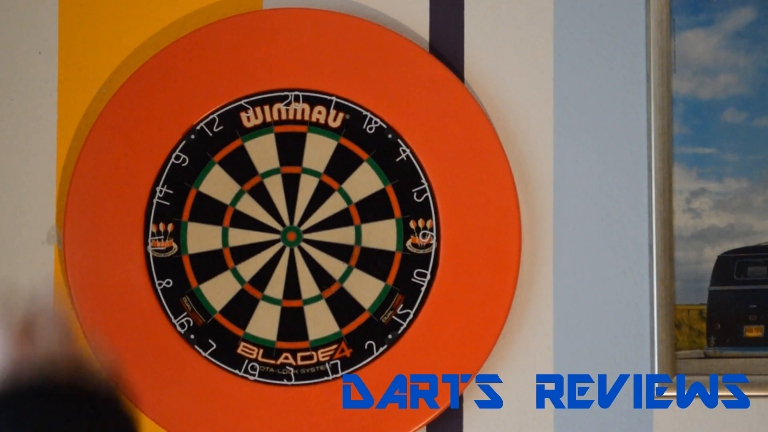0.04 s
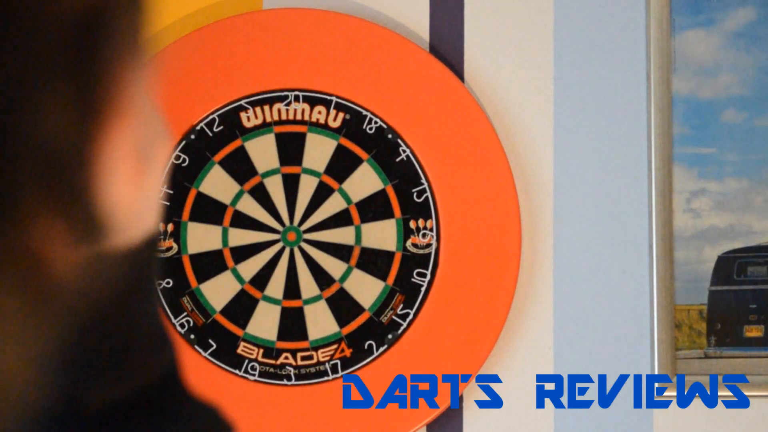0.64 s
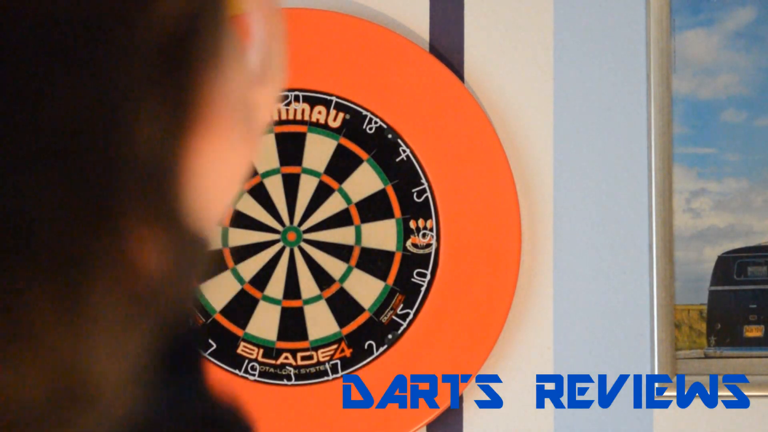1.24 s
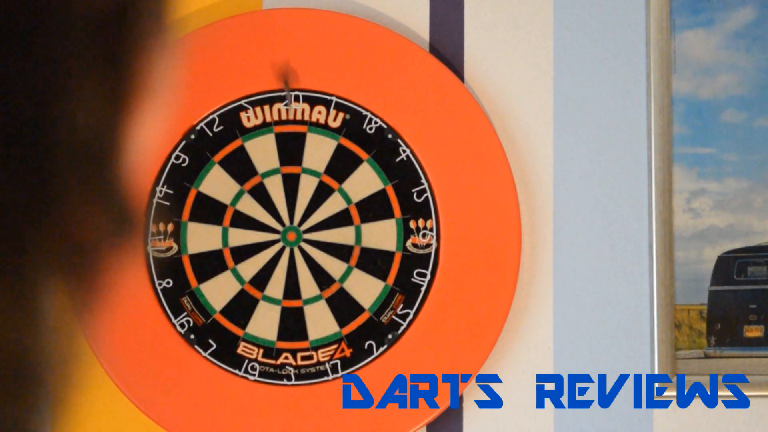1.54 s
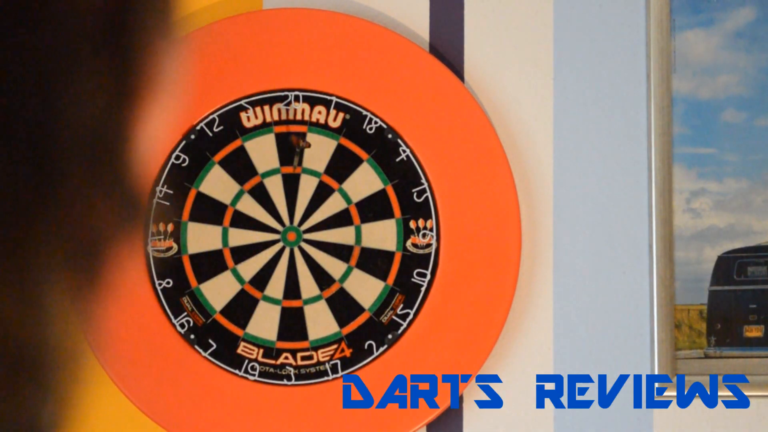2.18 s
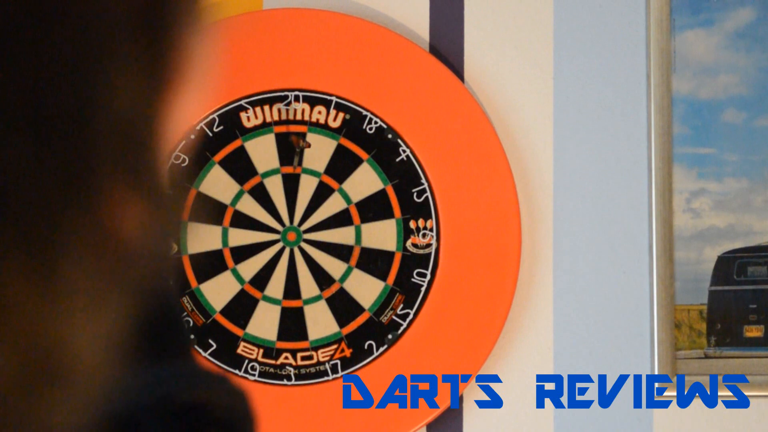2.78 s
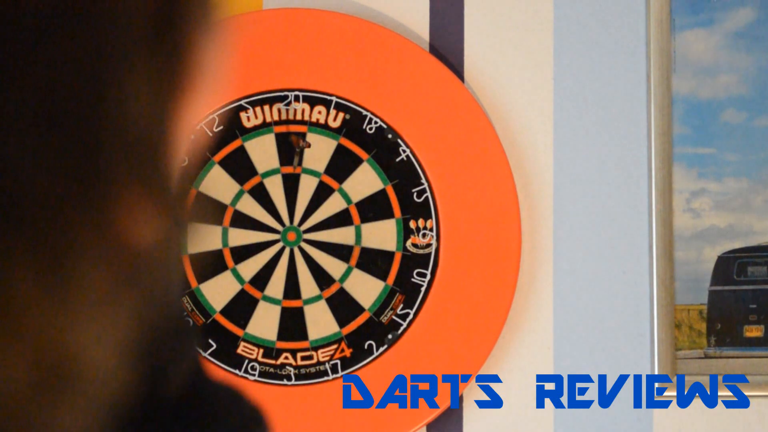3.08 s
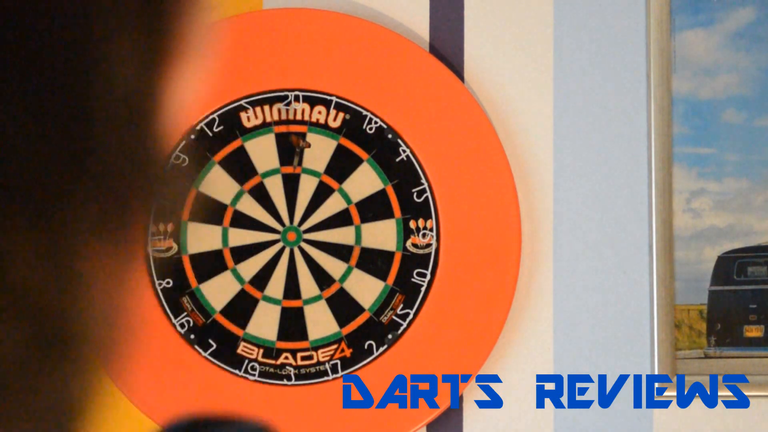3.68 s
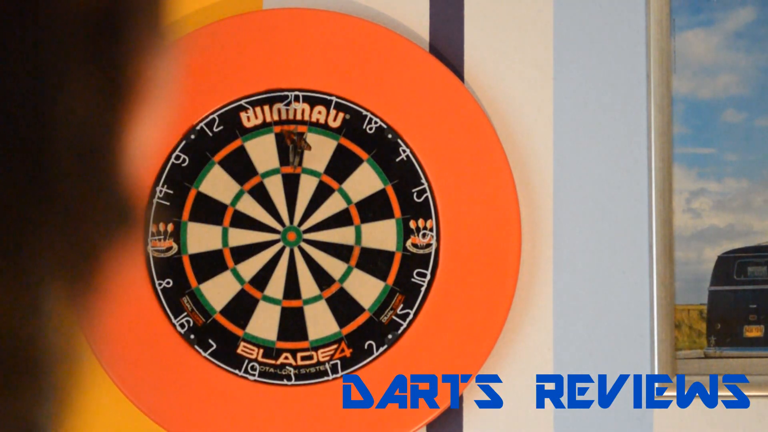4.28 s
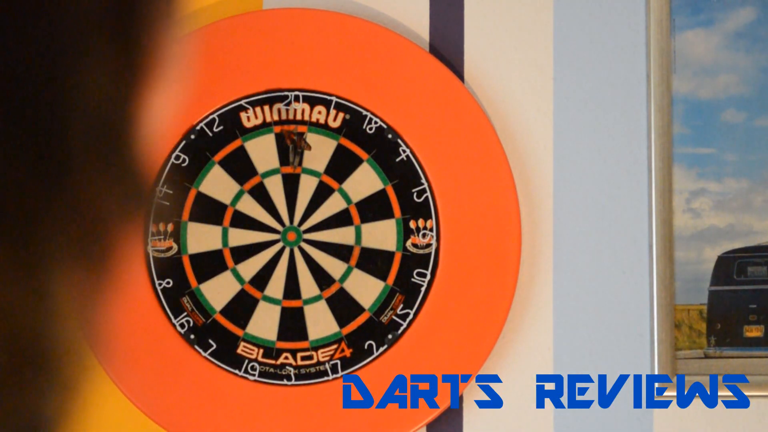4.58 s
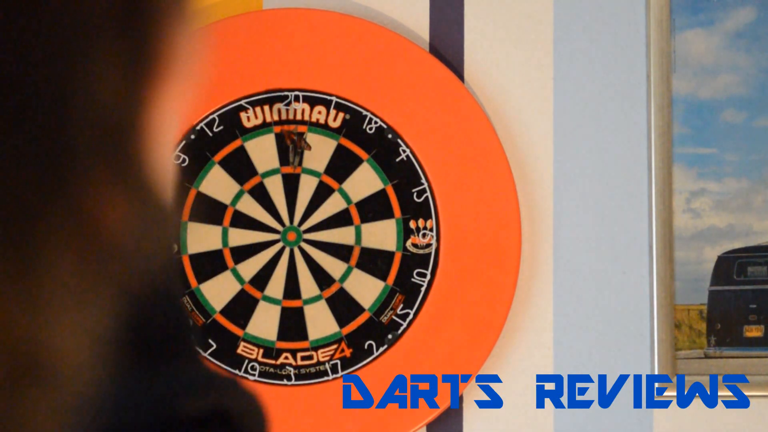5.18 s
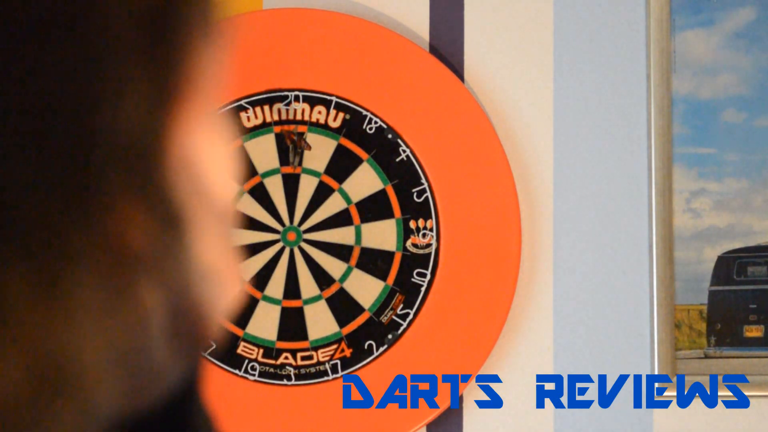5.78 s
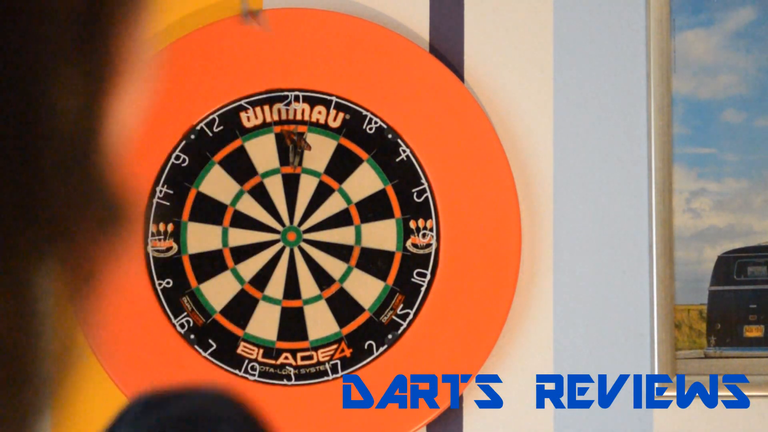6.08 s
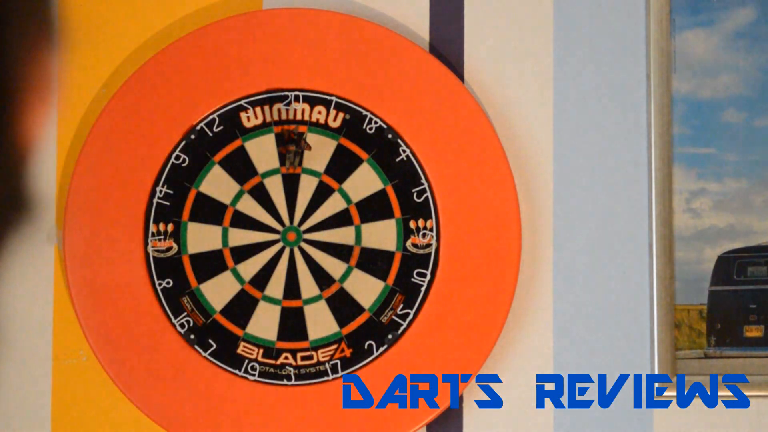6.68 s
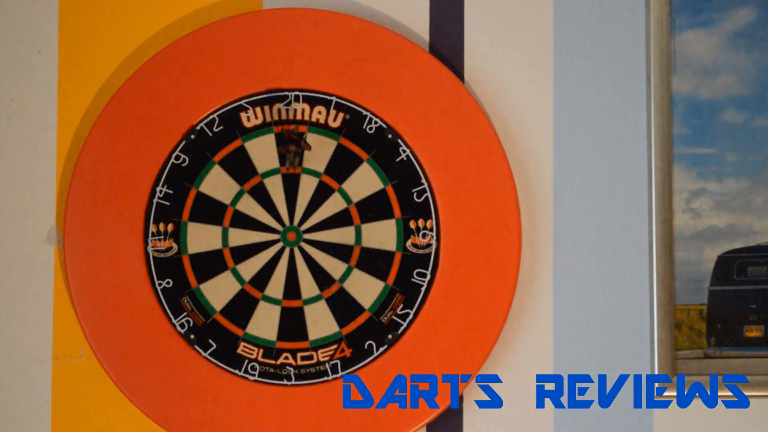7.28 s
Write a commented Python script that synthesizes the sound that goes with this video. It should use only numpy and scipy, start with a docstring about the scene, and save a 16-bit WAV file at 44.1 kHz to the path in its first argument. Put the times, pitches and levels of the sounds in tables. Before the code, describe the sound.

Three darts thud one after another into a wall-mounted board in a quiet room, the later ones clicking against those already stuck.

```python
"""Three darts in a quiet room

Each dart drums a wall-mounted bristle board, knocks in its fibres, clicks on the wire and rings its
own shaft; the later ones clash with those already stuck. The thrower shifts his feet, his sleeve
swishes, barrels chink in his hand. A clock ticks over faint hiss, whine, hum and a wavering drone."""
import sys
import numpy as np
from scipy import signal
from scipy.fft import rfft, irfft
from scipy.io import wavfile
from scipy.ndimage import uniform_filter1d

SR = 44100
rng = np.random.default_rng(int(sys.argv[2]) if len(sys.argv) > 2 else 0)


def int16_out(signal):
    """Quantize to a 16-bit WAV file."""
    q = np.round(np.clip(np.atleast_2d(signal).T, -1, 1) * 32767)
    wavfile.write(sys.argv[1], SR, q.astype(np.int16))


N = 323694
T = np.arange(N) / SR
RING_T, CONTACT_T = T[:SR], T[:4096]

# landings: t/s, thud/dB, drum-mode boost/dB, hollow-mode boost/dB, knock/dB,
# shaft f/Hz, shaft/dB, wire click/dB, barrel ring/dB
LANDINGS = [(1.842, -2, 0, 1.5, -2, 4280, -12.5, -15.5, -66),
            (4.1378, -1, -6.5, 5, -2, 3950, -12.5, -7, -52),
            (6.4605, -0.5, 2.5, -10, 0.5, 4450, -5, -7, -34)]
# board on its wall: f/Hz, level/dB, t60/s
BOARD_MODES = [(39.9, -50.5, 0.86), (59, -47, 0.58), (152.5, -42, 0.32), (189.3, -34.5, 0.28),
               (210.6, -39, 0.29), (258, -40.5, 0.37), (309, -42, 0.2), (358.3, -34.5, 0.36),
               (386.8, -20.5, 0.25), (412.4, -32.5, 0.36), (462.5, -32.5, 0.31), (581, -37, 0.44),
               (605, -33.5, 0.31), (616, -28.5, 0.23), (624.7, -24.5, 0.2), (703, -31.5, 0.24),
               (728, -30, 0.13), (790, -44, 0.25), (960, -41, 0.3), (1465, -36.5, 0.29),
               (1640, -42.5, 0.31), (1709, -39.5, 0.35), (1876, -34, 0.19)]


def board_thuds(build_cycles=0.76, wire_db=6, wire_db_per_click_db=0.66):
    """A stopping dart pushes the board; the spot weights the modes, a harder click rings the wires more."""
    def band(centre_hz, octaves):
        return np.exp(-(np.log2(np.array(BOARD_MODES)[:, 0] / centre_hz) / octaves) ** 4)

    out = np.zeros(N)
    # low modes swing up slowest, so the wall's rumble comes last
    modes = [undb(db) * mode(hz, t60_s) * (1 - np.exp(-RING_T * hz / build_cycles))
             for hz, db, t60_s in BOARD_MODES]
    drum, hollow, wire = band(470, octaves=0.85), band(745, octaves=0.15), band(1750, octaves=0.2)
    for t_s, thud_db, drum_db, hollow_db, *_, click_db, _ in LANDINGS:
        wire_boost_db = wire_db + wire_db_per_click_db * click_db
        modes_db = thud_db + drum_db * drum + hollow_db * hollow + wire_boost_db * wire
        add(out, t_s, undb(modes_db) @ modes)
    return out


# fibre crunch spectrum: f/Hz, level/dB
KNOCK_SPECTRUM = [(90, -51), (200, -2.5), (500, -6.5), (720, 4.5), (1150, -5), (1550, -2), (1900, -5.5),
                  (2400, -16.5), (2850, -14.5), (3400, -9.5), (4000, -12.5), (5200, -29), (15000, -47)]


def point_knocks(crunch_t60_s=0.0292, sink_s=0.0025, lead_s=0.0025, shaft_t60_s=0.031):
    """The point crunches into the fibres just before the board gives, and the shaft shivers."""
    out = np.zeros(N)
    for t_s, _, _, _, knock_db, shaft_hz, shaft_db, *_ in LANDINGS:
        crunch = unit(colour(burst(crunch_t60_s, sink_s), KNOCK_SPECTRUM))
        add(out, t_s - lead_s, undb(knock_db) * room(crunch))
        shiver = unit(narrow(burst(shaft_t60_s), shaft_hz, width_hz=550))
        add(out, t_s, undb(shaft_db) * room(shiver))
    return out


# darts and flights clashing: t/s, click level/dB, slide before the click/s
CLASHES = [(1.91, -29, .001), (2.1925, -25.5, .005), (4.1342, -5, .009), (4.1553, -9, .002),
           (6.196, -44, .004), (6.456, 4.5, .005), (6.4718, -16, .002)]


def contacts(seat_lag_s=0.0006, seat_slide_s=0.005, seat_slide_db=3.3, full_slide_s=0.0078,
             clash_ring_db=-58):
    """Wire contacts and clashes as rows of t/s, click/dB, slide/s, slide/dB, ring/dB."""
    seats = [(t_s + seat_lag_s, db, seat_slide_s, db + seat_slide_db, ring_db)
             for t_s, *_, db, ring_db in LANDINGS]
    clashes = [(t_s, db, slide_s, db + 20 * np.log10(slide_s / full_slide_s), db + clash_ring_db)
               for t_s, db, slide_s in CLASHES]
    return seats + clashes


# metal click spectrum: f/Hz, level/dB
CLICK_SPECTRUM = [(200, -12), (1000, -10), (2000, -4), (3000, -6), (4400, 0.5), (5600, -3), (7100, 2),
                  (10500, 1), (11500, -6.5), (12400, -12.5), (15500, -23)]


def dart_clicks(snap_t60_s=0.007, start_pressure=0.15):
    """A dart slides along the wire or another dart, ever harder, then snaps against it."""
    out = np.zeros(N)
    for t_s, click_db, slide_s, slide_db, _ in contacts():
        pressure = np.interp(CONTACT_T, [0, slide_s], [start_pressure, 1], right=0)
        slide = colour(cluster(pressure), CLICK_SPECTRUM)
        add(out, t_s - slide_s, undb(slide_db) * room(slide))
        snap = colour(burst(snap_t60_s), CLICK_SPECTRUM)
        add(out, t_s, undb(click_db) * room(snap))
    return out


# barrel, shaft and flight: f/Hz, level/dB, t60/s
DART_RESONANCES = [(3170, -1.5, 0.24), (3820, -15, 0.33), (4385, 9, 0.15), (4740, -12, 0.28),
                   (4580, 7, 0.17), (4800, -11, 0.25), (5078, -21, .22), (5630, -4, .28), (5800, -5, 0.37),
                   (6010, 8, 0.14), (6500, -19, 0.15), (6850, -27, 0.19), (8272, -24, 0.18),
                   (9000, -31, 0.11)]


def dart_rings(build_s=0.0045):
    """A dart rings on after each contact, most when hit squarely."""
    out = np.zeros(N)
    ring = sum(undb(db) * mode(hz, t60_s) for hz, db, t60_s in DART_RESONANCES)
    ring *= 1 - np.exp(-RING_T / build_s)
    for t_s, *_, ring_db in contacts():
        add(out, t_s, undb(ring_db) * ring)
    return out


# barrels touching: t/s, ping f/Hz, level/dB
BARREL_TOUCHES = [(4.497, 3620, -41), (4.554, 4480, -43)]


def barrel_chinks(touch_t60_s=0.02, tick_db=4):
    """Barrels touch in the hand: a tick and a brief ping."""
    out = np.zeros(N)
    for t_s, hz, db in BARREL_TOUCHES:
        touch = burst(touch_t60_s)
        ping = unit(narrow(touch, hz, width_hz=320))
        tick = undb(tick_db) * colour(touch, CLICK_SPECTRUM)
        add(out, t_s, undb(db) * room(ping + tick))
    return out


# cloth spectrum: f/Hz, level/dB
SLEEVE_SPECTRUM = [(40, -27), (200, 13), (600, -1), (2000, 9), (5000, -6), (10500, -1.5), (15000, -20)]
# arm movements: t/s, half-length/s, level/dB
ARM_MOVES = [(1.59, 0.037, -59.5), (3.89, 0.1, -66), (4.552, 0.058, -70), (6.215, 0.054, -59.5)]


def sleeve_swishes():
    """Cloth swishes as the arm moves."""
    envelope = sum(undb(db) * hump(t_s, half_s) for t_s, half_s, db in ARM_MOVES)
    return envelope * colour(rng.standard_normal(N), SLEEVE_SPECTRUM)


# weight shifts: t/s, floor sway/dB, scuff/dB
WEIGHT_SHIFTS = [(0.559, -49.5, -61.5), (0.809, -56.5, -69)]


def feet(floor_hz=29, floor_t60_s=2.05, lean_s=0.045, scuff_half_s=0.062):
    """Shifting weight scuffs the floor and sets it swaying."""
    out = np.zeros(N)
    scuff = noise_band(hz=180, width_hz=170)
    sway = mode(floor_hz, floor_t60_s) * (1 - np.exp(-RING_T / lean_s))
    for t_s, sway_db, scuff_db in WEIGHT_SHIFTS:
        add(out, t_s, undb(sway_db) * sway)
        out += undb(scuff_db) * hump(t_s, scuff_half_s) * scuff
    return out


# clock case spectrum: f/Hz, level/dB
CASE_SPECTRUM = [(600, -31), (1500, -16), (1750, 6), (2000, -5), (3300, -9.5), (6300, -8), (8500, -27),
                 (15000, -24)]


def clock(start_s=0.395, level_db=-32, rattle_t60_s=0.078, rise_s=0.0045):
    """A nearby clock's gears step once a second and rattle its case."""
    out = np.zeros(N)
    for t_s in np.arange(start_s, T[-1], 1):
        tick = colour(burst(rattle_t60_s, rise_s), CASE_SPECTRUM)
        add(out, t_s, undb(level_db) * room(tick, wet_db=-1))
    return out


# hiss spectrum: f/Hz, level/dB
HISS_SPECTRUM = [(20, -25), (45, -4), (75, -6), (100, -11.5), (140, -5.5), (180, -2), (280, -7), (600, -9),
                 (1000, -7.5), (1500, -12), (2500, -10), (3300, -15.5), (7000, -18.5), (10000, -20),
                 (15800, -22.5)]
# hum tones: f/Hz, rms level/dB
HUM_TONES = [(59.2, -74.5), (91.5, -73), (118.4, -75.5)]
# drone envelope: t/s, rms level/dB
DRONE_ENVELOPE = [(0, -56.5), (0.2, -73.5), (2.05, -72.7), (2.25, -64.5), (2.55, -70), (3.7, -78.5),
                  (5.0, -81.5), (7.34, -84)]


def background(hiss_db=-61, whine_db=-69):
    """Even hiss, a thin band of whine, a low hum and a wavering drone."""
    hiss = undb(hiss_db) * colour(rng.standard_normal(N), HISS_SPECTRUM)
    whine = undb(whine_db) * noise_band(hz=2790, width_hz=280)
    hum = sum(undb(db) * np.sqrt(2) * np.sin(2 * np.pi * (hz * T + rng.random())) for hz, db in HUM_TONES)
    drone_db = np.interp(T, *np.transpose(DRONE_ENVELOPE))
    drone = undb(drone_db) * noise_band(hz=182, width_hz=25)
    return hiss + whine + hum + drone


# room decay: f/Hz, t60/s
ROOM_DECAY = [(150, .32), (1600, 0.3), (3000, 0.34), (6300, 0.28), (13000, 0.2)]


def room(sound, wet_db=0.5, build_s=0.0011, bands=5):
    """A short sound plus the dense reflections of its own spot in the room; the treble dies first."""
    edges_hz = np.geomspace(150, 18000, bands + 1)
    t, tail = T[:SR // 2], 0
    for low_hz, high_hz in zip(edges_hz, edges_hz[1:]):
        t60_s = lookup(ROOM_DECAY, (low_hz + high_hz) / 2)
        echoes = rng.standard_normal(len(t)) * fade(t60_s, t) * (1 - np.exp(-t / build_s))
        bandpass = signal.butter(3, [low_hz, high_hz], "band", fs=SR, output="sos")
        tail = tail + signal.sosfilt(bandpass, echoes)
    out = undb(wet_db) * signal.fftconvolve(sound, unit(tail))
    out[:len(sound)] += sound
    return out


def cluster(envelope, passes=4):
    """Many tiny contacts under an envelope, evened out to have no pitch."""
    x = rng.standard_normal(len(envelope)) * envelope
    for _ in range(passes):
        x = irfft(np.exp(1j * np.angle(rfft(x))))  # flatten the spectrum
        x *= envelope / np.sqrt(uniform_filter1d(x ** 2, size=48) + 1e-12)  # restore the envelope
    return unit(x)


def burst(t60_s, rise_s=1e-4):
    """A cluster that swells quickly and dies."""
    return cluster(fade(t60_s, CONTACT_T) * (1 - np.exp(-CONTACT_T / rise_s)))


def mode(hz, t60_s):
    """One decaying resonance, struck from rest."""
    return fade(t60_s, RING_T) * np.sin(2 * np.pi * hz * RING_T)


def fade(t60_s, t):
    """Exponential decay."""
    return np.exp(-np.log(1000) * t / t60_s)


def hump(t_s, half_s):
    """Gaussian swell centred on t_s."""
    return np.exp(-((T - t_s) / half_s) ** 2)


def colour(x, spectrum, size=4096):
    """Minimum-phase filter of unit energy with the given spectral shape."""
    gain = undb(lookup(spectrum, np.fft.rfftfreq(size, 1 / SR)))
    cepstrum = irfft(np.log(gain))
    cepstrum[1:size // 2] *= 2
    cepstrum[size // 2 + 1:] = 0
    impulse = unit(irfft(np.exp(rfft(cepstrum))))
    return signal.fftconvolve(x, impulse)[:len(x)]


def narrow(x, hz, width_hz):
    """Two passes through one resonance, for steep skirts."""
    b, a = signal.iirpeak(hz, hz / width_hz, fs=SR)
    return signal.lfilter(b, a, signal.lfilter(b, a, x))


def noise_band(hz, width_hz):
    """Band of noise at unit rms."""
    noise = narrow(rng.standard_normal(N), hz, width_hz)
    return noise / noise.std()


def lookup(points, hz):
    """Interpolate (f/Hz, value) points over log frequency."""
    points_hz, values = np.transpose(points)
    return np.interp(np.log(np.maximum(hz, 1)), np.log(points_hz), values)


def undb(db):
    """Decibels to gain."""
    return 10 ** (np.asarray(db) / 20)


def unit(x):
    """Scale to unit energy."""
    return x / np.sqrt(np.sum(x ** 2))


def add(track, t_s, sound):
    """Mix a sound into a track at t_s."""
    start = int(t_s * SR)
    track[start:start + len(sound)] += sound[:N - start]


def scene():
    """Mono mix, heard from beside the thrower."""
    darts = board_thuds() + point_knocks() + dart_clicks() + dart_rings() + barrel_chinks()
    return (darts + clock() + sleeve_swishes() + feet() + background())[None]


def record(dry, cutoff_hz=15800):
    """Steep low-pass on the top treble."""
    return signal.sosfilt(signal.ellip(10, 0.2, 70, cutoff_hz, fs=SR, output="sos"), dry)


dry = scene()
out = record(dry)
int16_out(out)
```